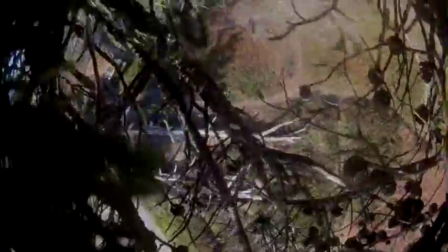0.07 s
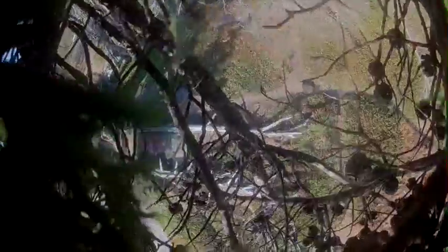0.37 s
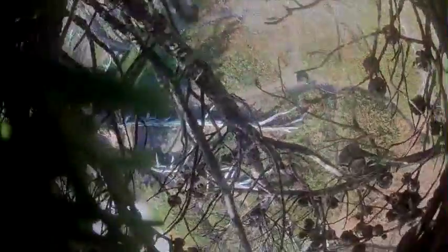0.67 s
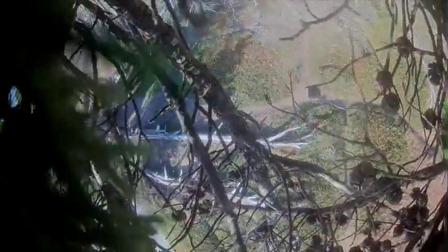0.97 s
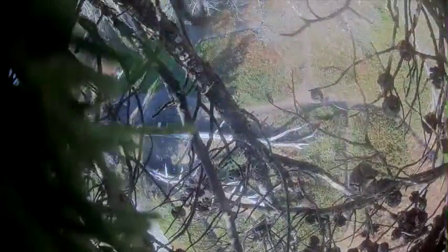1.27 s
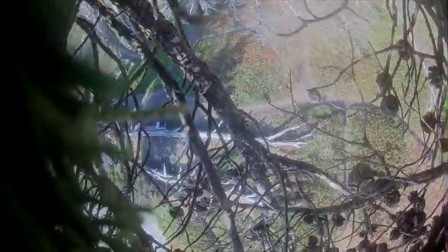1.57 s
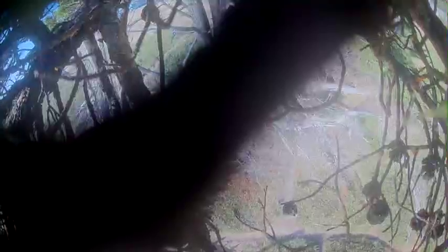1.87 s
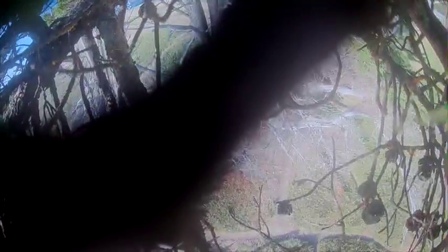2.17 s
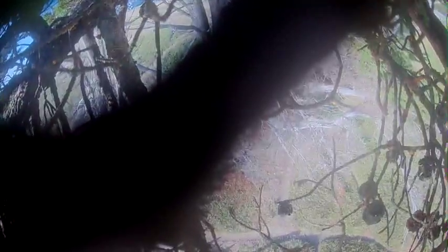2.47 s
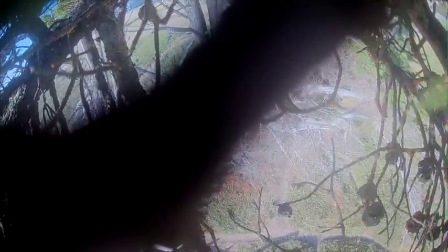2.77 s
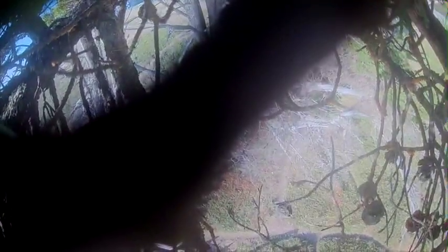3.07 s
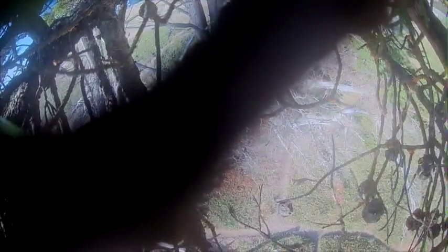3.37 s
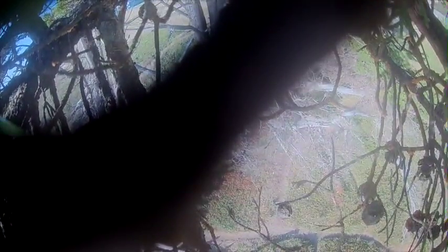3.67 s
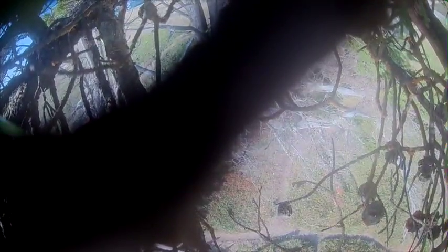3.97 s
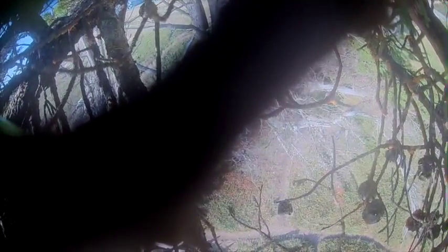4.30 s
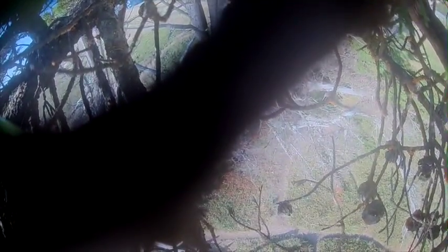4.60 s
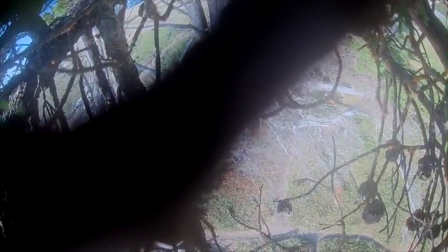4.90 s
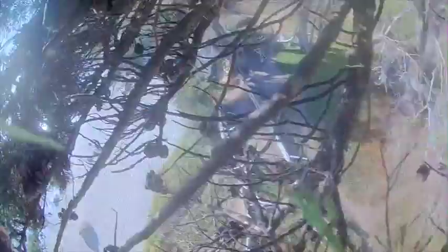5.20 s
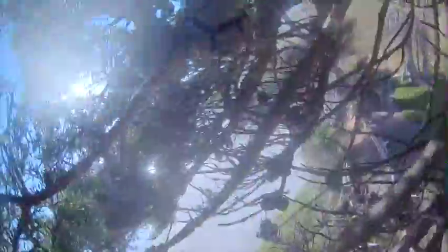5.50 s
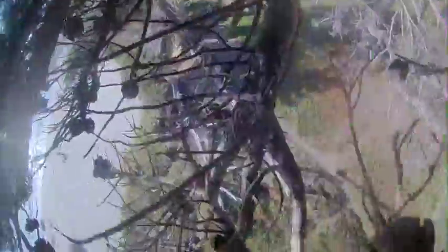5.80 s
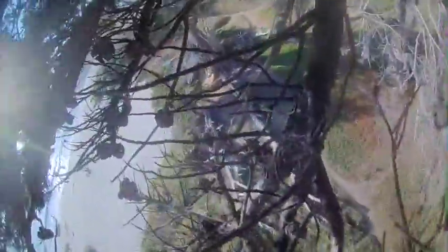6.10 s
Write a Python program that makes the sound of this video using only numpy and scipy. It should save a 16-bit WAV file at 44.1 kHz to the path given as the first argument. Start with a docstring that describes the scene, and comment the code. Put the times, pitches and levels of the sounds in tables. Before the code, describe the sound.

A small drone is stuck in a pine tree, heard very close through its own microphone. Its blades beat and grind on the branches in rapid, crunchy bursts, with thin ticking from a stalled motor and a brief wavering whine. The motors stop, leaving soft wind hissing in the needles. Then a hard knock starts a short, racing whine that falls away, and twigs tap the body. The hardest blows distort.

```python
"""Chopping and grinding: a small drone is stuck in a pine, heard by its own tiny microphone.
Its motors try to start. The blades beat and rub on branches and make the frame ring, stalled motors
twitch, and free ones whine, at last racing to tear the drone loose. Twigs tap the body, wind hisses
in the needles, and the hard blows overload the microphone."""
import sys
import numpy as np
from scipy import signal
from scipy.fft import rfft, irfft, next_fast_len
from scipy.io import wavfile
from scipy.ndimage import map_coordinates

SR = 44100
rng = np.random.default_rng(int(sys.argv[2]) if len(sys.argv) > 2 else 0)


def log_audio(samples):
    """Write samples as a 16-bit WAV file to the path given in sys.argv[1]."""
    # one column per channel
    frames = np.atleast_2d(samples).T
    # limit to full scale, then quantise
    limited = np.clip(frames, -1, 1)
    pcm = np.round(limited * 32767).astype(np.int16)
    wavfile.write(sys.argv[1], SR, pcm)


N = 275625

# the tone of crunching bark: pitch_hz, level_db
BARK_TONE = [(100, -48), (400, -27.5), (800, -4.5), (1300, -2.5), (2000, -0.5), (2350, -4), (2600, -4.5),
             (3100, -8.5), (3650, -3), (4600, -15.5), (6200, -17.5), (8000, -21.5), (11000, -20.5),
             (16000, -38)]


def amp(db):
    """Turn decibels into a number to multiply a sound by."""
    return 10 ** (np.asarray(db) / 20)


def unit(x):
    """Scale a sound to an average (rms) level of 1."""
    return x / np.sqrt(np.mean(x ** 2) + 1e-20)


def gain(points, hz):
    """Read the gain at a pitch from rows of pitch_hz, level_db."""
    pitch_hz, level_db = np.transpose(points)
    return amp(np.interp(np.log(hz + 1), np.log(pitch_hz + 1), level_db))


def curves(rows):
    """Join timed rows with straight lines: one curve for each column after the time."""
    time_s, *columns = np.transpose(rows)
    return [np.interp(np.arange(N) / SR, time_s, column) for column in columns]


def wobble(rate):
    """A smooth curve through `rate` random values a second."""
    return map_coordinates(rng.standard_normal(int(N * rate / SR) + 4), [np.arange(N) * rate / SR])


def filtered(x, response):
    """Turn each pitch in a sound up or down by response(hz)."""
    size = next_fast_len(N + SR // 2)
    return irfft(rfft(x, size) * response(np.fft.rfftfreq(size, 1 / SR)), size)[:N]


def coloured(x, points):
    """Shape a sound's tone by rows of pitch_hz, level_db, then scale it to level 1."""
    return unit(filtered(x, lambda hz: gain(points, hz)))


def add(track, start_s, sound):
    """Mix a sound into the track at start_s."""
    start = max(round(start_s * SR), 0)
    track[start:start + len(sound)] += sound[:N - start]


def contacts(rows, rise_s=0.016, fall_s=0.11):
    """Loudness of contacts that catch, swell, ease and let go; rise_s and fall_s each span 60 dB."""
    t, loudness = np.arange(N) / SR, np.zeros(N)
    for start, peak, end, peak_db, swell_db in rows:
        outside = np.maximum(start - t, 0) / rise_s + np.maximum(t - end, 0) / fall_s
        below_peak_db = swell_db * np.interp(t, [start, peak, end], [1, 0, 1])
        loudness += amp(peak_db - below_peak_db - 60 * outside)
    return loudness


def wind(flutter_db=1.0, sizzle_db=-44, sizzle_growth=3.25, usual_db=-31):
    """Air hisses through the needles; a thin sizzle on top swells and sinks more than the hiss."""
    # the wind's strength: time_s, level_db
    strength = [(0, -28.5), (.83, -33), (2.65, -30.5), (3.55, -30.5), (3.85, -30), (4.2, -31.5),
                (4.95, -31), (5.55, -33), (6.25, -33.5)]
    # the tone of the hiss: pitch_hz, level_db
    hiss_tone = [(30, -26), (100, -30), (200, -25), (300, -21), (500, -16.5), (800, -8), (1200, -3.5),
                 (1900, 1), (3100, -2), (3900, -7), (4800, -17.5), (6300, -41), (8000, -36), (15500, -56)]
    # the tone of the sizzle: pitch_hz, level_db
    sizzle_tone = [(3000, -66), (4600, -15), (5700, 0.5), (6400, -5), (7200, -12), (8100, -35),
                   (10800, -20), (12000, -30), (15500, -36)]
    hiss_db, = curves(strength)
    hiss = amp(hiss_db) * coloured(rng.standard_normal(N), hiss_tone)
    sizzle = coloured(rng.standard_normal(N), sizzle_tone)
    sizzle *= amp(sizzle_db + sizzle_growth * (hiss_db - usual_db))
    return amp(flutter_db * wobble(9.2)) * (hiss + sizzle)


def settling_twigs(middle_hz=1994, spread_octaves=0.356, scatter_db=1):
    """Twigs settle and spring back in short spells. Gives faint taps: start_s, level_db, pitch_hz."""
    # spells of settling: start_s, end_s, taps_per_s, level_db
    spells = [(1.721, 1.88, 20, -24), (5.435, 5.72, 14, -24), (5.76, 5.88, 45, -21),
              (5.954, 6.08, 29.4, -25)]
    rows = []
    for start, end, rate, level_db in spells:
        for time_s in np.arange(start, end, 1 / rate):
            size, pitch = rng.standard_normal(2)
            late_s = rng.random() / rate / 2
            pitch_hz = middle_hz * 2 ** (spread_octaves * pitch)
            rows.append((time_s + late_s, level_db + scatter_db * size, pitch_hz))
    return rows


def twig_taps(snap_db=2, wood_db=6, snap_fade_s=0.016, wood_fade_s=0.017, stretch=0.032, rise_s=0.0012):
    """Each twig gives a dry snap and a short woody note; heavier ones stay in contact longer."""
    # the clearest twigs and cones tapping the body: start_s, level_db, pitch_hz
    clear_taps = [(0.065, -16, 820), (0.085, -13, 1060), (0.108, -11, 2540), (.127, -15, 2630),
                  (.801, -21, 2620), (.823, -12.5, 1062), (.855, -21, 2180), (.882, -14.5, 2180),
                  (1.286, -14, 1630), (1.335, -5.5, 2530), (1.501, -9, 1680), (1.534, -8, 3630),
                  (1.594, -5, 1624), (1.704, -15, 1790), (2.656, -14.5, 1720), (4.977, -15.5, 2560),
                  (5.011, -11.5, 1636), (5.286, -13.5, 1650), (5.321, -10, 1350), (5.342, -12.5, 1360),
                  (5.355, -17.5, 1940), (5.414, -16.5, 1410), (5.437, -19, 4020), (5.744, -11, 3910),
                  (5.774, -17, 1710), (5.79, -2, 3810), (5.842, -19.5, 1330), (5.888, -13.5, 1340),
                  (5.898, -6.5, 1466)]
    t = np.arange(SR // 10) / SR
    onset = 1 - np.exp(-t / rise_s)
    snaps, notes = np.zeros(N), np.zeros(N)
    for start_s, level_db, pitch_hz in clear_taps + settling_twigs():
        fall_db = -60 * t / np.exp(stretch * (level_db + 16.5))  # louder taps fade more slowly
        add(snaps, start_s, amp(level_db + fall_db / snap_fade_s) * onset)
        drift = np.cumsum(rng.normal(0, 0.059, len(t)))  # roughens the note
        note = np.sin(2 * np.pi * pitch_hz * t + drift)
        add(notes, start_s, amp(level_db + fall_db / wood_fade_s) * onset * note)
    snap_tone = [(100, -51), (900, 4.5), (2000, 4.5), (6000, -6), (8000, -20), (11000, -11), (16000, -38)
                 ]
    crack = coloured(rng.standard_normal(N), snap_tone)
    return amp(snap_db) * snaps * crack + amp(wood_db) * notes


def stalled_motor(ticks_per_s=85, uneven_db=3.5, scatter_db=3, fade_s=0.017):
    """A blocked motor jerks from one magnet to the next: thin, uneven ticks."""
    # spells of twitching against a branch: start_s, peak_s, end_s, peak_db, swell_db
    twitches = [(0, .7, 0.804, -21.5, 9.5), (.88, 1.25, 2.3, -28, 2), (1.8, 1.93, 2, -31, 24),
                (2.685, 2.7, 2.8, -23.5, 16)]
    steps = np.floor(np.cumsum(ticks_per_s * amp(uneven_db * wobble(60))) / SR)
    kicks = np.diff(steps, prepend=0) * amp(scatter_db * rng.standard_normal(N))
    tick_shape = amp(-60 * np.arange(SR // 20) / SR / fade_s)
    ticks = signal.fftconvolve(kicks, tick_shape)[:N]
    metal_tone = [(300, -42), (1500, -1), (4000, -4.5), (5500, -2), (6400, -0.5), (7800, -17),
                  (11000, -9.5), (16000, -25)]
    metal = coloured(rng.standard_normal(N), metal_tone)
    return contacts(twitches) * unit(ticks * metal)


def branch_rasp(wood_hz=1315, width_hz=140, lumps_db=3):
    """Uneven rubbing brings out the one woody note of a thin branch."""
    # the blades rubbing this branch: start_s, peak_s, end_s, peak_db, swell_db
    rasps = [(.27, .4, 0.52, -16, 8.7), (.94, 1.15, 1.22, -12.5, 9.3)]
    rubbing = rng.standard_normal(N) * amp(lumps_db * wobble(100))
    wood = filtered(rubbing, lambda hz: hz * width_hz / (wood_hz ** 2 - hz ** 2 + 1j * hz * width_hz))
    return contacts(rasps) * unit(wood)


def frame_ring(t, tilt_db_per_octave, scatter_db=1.5):
    """The struck frame rings with several notes at once; more tilt favours the high ones."""
    # the frame's own notes: pitch_hz, level_db, fade_s (time to fall 60 dB)
    notes = [(859, -3.5, 0.021), (1088, -15.5, 0.038), (1606.6, -1, 0.052), (2580, -3, 0.035),
             (3643, -9, 0.026), (4166, -16.5, 0.033), (5400, -21, 0.043), (6410, -21, 0.016)]
    main_hz = max(notes, key=lambda note: note[1])[0]
    ring = np.zeros(len(t))
    for pitch_hz, level_db, fade_s in notes:
        size, phase = rng.standard_normal(2)
        start_db = level_db + tilt_db_per_octave * np.log2(pitch_hz / main_hz) + scatter_db * size
        ring += amp(start_db - 60 * t / fade_s) * np.sin(2 * np.pi * pitch_hz * t + phase)
    return ring


def grinding(slips_per_s=700, scatter_db=5, lumps_db=1.5, frame_gain=0.63, rub_gain=0.82):
    """Bark catches and slips on the blades; the slips shake the frame too."""
    # the blades pressing on bark: start_s, peak_s, end_s, peak_db, swell_db
    rubs = [(0, .005, 0.041, -14, 17), (.11, .43, 0.776, -12, 16), (.89, 1.19, 1.294, -14, 10),
            (1.26, 1.32, 2.14, -30.5, 11), (1.92, 2.27, 2.43, -18.5, 8.5), (2.69, 3.18, 3.21, -34.5, -1.5),
            (5.025, 5.06, 5.1, -14.5, 3), (5.17, 5.19, 5.24, -6.5, 8.5), (5.265, 5.32, 5.46, -32, 9),
            (5.745, 5.805, 5.94, -26.5, 13.5)]
    slips = (rng.random(N) < slips_per_s / SR) * rng.standard_normal(N)
    slips *= amp(scatter_db * rng.standard_normal(N))
    scrape = coloured(unit(slips) + rub_gain * rng.standard_normal(N), BARK_TONE)
    ring = frame_ring(np.arange(SR // 10) / SR, tilt_db_per_octave=16)
    frame = unit(signal.fftconvolve(scrape, ring)[:N])
    return contacts(rubs) * unit((scrape + frame_gain * frame) * amp(lumps_db * wobble(130)))


def free_motors(cruise_hz=300, flutter=0.0021, rough_db=2, fade_in_share=0.14, fade_out_s=0.012):
    """Blade hum and magnet whine glide with the speed; a bent tip brushes the needles once a turn."""
    # one list for each free run: time_s, blade_rate_hz, whine_db
    runs = [
        [(1.86, 149.5, -20), (1.93, 419, -18.5), (2.05, 424.6, -36), (2.14, 331.5, -25), (2.25, 376, -25),
         (2.34, 341, -18), (2.415, 195.4, -18), (2.445, 176.5, -29), (2.48, 172.9, -27), (2.545, 188, -19.5),
         (2.62, 62, -40)],
        [(5.035, 130, -12), (5.06, 399, -6), (5.072, 741.7, -27), (5.092, 1064, -24), (5.116, 1189, -24),
         (5.142, 1073, -19), (5.18, 746.5, -28), (5.222, 380, -8), (5.245, 216.3, -21), (5.275, 78.4, -33)],
    ]
    # the tones of the blades: times_blade_rate, level_db
    blade_tones = [(1, 4.5), (2, 3.5), (3, -3), (4, -9.5)]
    # the tones of the magnets: times_blade_rate, level_db
    magnet_tones = [(14, -6), (18, -0.5), (36, -4)]
    # how the microphone's opening shapes the hum: pitch_hz, level_db
    mic_opening = [(60, -17), (350, -19), (800, -6), (1200, -5.5), (6500, 3.5), (7500, 5), (9000, -9),
                   (14000, -70)]
    # how strongly the motor's shell gives off the whine: pitch_hz, level_db
    motor_shell = [(1500, 5), (2400, 1), (3050, -10), (3650, 6), (4700, -8), (6300, 6.5), (7100, -7.5),
                   (8200, -28)]
    # the tone of air and bark thrown off the blades: pitch_hz, level_db
    swish_tone = [(100, -42), (500, -28), (950, 1.5), (1600, 2), (3600, -5), (4150, 8), (4700, -15.5),
                  (6500, 3), (8000, -28), (11000, -5.5), (16000, -29)]
    t, out = np.arange(N) / SR, np.zeros(N)
    air = coloured(rng.standard_normal(N), swish_tone)
    for run in runs:
        start, end = run[0][0], run[-1][0]
        on = (t > start) & (t < end)
        rate_hz, whine_db = (curve[on] for curve in curves(run))
        octaves = np.log2(rate_hz / cruise_hz)
        hum_db = -29.5 + 13 * octaves  # faster blades are louder
        swish_db = -19 + 7 * np.minimum(octaves, 1.17)  # levels off at high speed
        fade_in = (t[on] - start) / (end - start) / fade_in_share
        fade = np.minimum(np.minimum(fade_in, (end - t[on]) / fade_out_s), 1)
        phase = 2 * np.pi * np.cumsum(rate_hz * (1 + flutter * wobble(250)[on])) / SR
        for tones, db, shape in (blade_tones, hum_db, mic_opening), (magnet_tones, whine_db, motor_shell):
            loudness = fade * amp(db + rough_db * wobble(300)[on])
            for multiple, level_db in tones:
                hz = multiple * rate_hz
                strength = amp(level_db) * gain(shape, hz) * (hz < SR / 2)
                out[on] += loudness * strength * np.sin(multiple * phase + np.pi / 4)
        turn = (phase / (2 * np.pi) / 2) % 1  # two blade passes to a turn
        bent_tip = 1.1 * np.exp(-turn / 0.19)
        pulsing = 1 + 0.24 * np.cos(phase) + bent_tip
        out[on] += fade * amp(swish_db) * air[on] * unit(pulsing)
    return out


def blow_list(knock_tilt_db_per_octave=7.5, scatter_db=1.5):
    """Lone knocks, then bouts of beating. Gives start_s, crunch_db, ring_db, tilt_db_per_octave."""
    # a blade or arm knocking once on a branch: start_s, crunch_db, ring_db
    knocks = [(.001, -8, -18), (0.141, -12, -8.5), (.177, 6, 0), (.19, 7, -9), (.221, -7, -8),
              (.239, -4, -6), (.253, 1, -5), (.901, 14.5, 5), (1.239, 1.5, -11), (1.271, -15, -14),
              (1.37, -11, -11), (1.436, -4, -21), (5.025, 13.5, 8.5), (5.053, -4, -9), (5.206, 6, 2),
              (5.252, -3, -13)]
    # a blade beating on a branch: first_s, last_s, blows_per_s, quickening (below 0 it slows),
    # crunch_db, ring_db, tilt_db_per_octave
    bouts = [(.297, 0.55, 51.6, -0.0038, 4, -1.5, 6.5), (0.577, 0.757, 27.9, -0.26, 7.5, 5, 2.9),
             (.94, 1.208, 45, .09, 1.5, -6, 5.9), (1.301, 1.671, 18.8, -0.021, 3.5, -3.5, 6.3),
             (1.976, 2.327, 40.2, .125, 2.5, 6.5, 3.8), (2.729, 2.851, 24.4, -0.046, -1, 4.5, 1.4),
             (2.886, 3.188, 33.2, 0.043, 2, 7, 1.4)]
    rows = [(*knock, knock_tilt_db_per_octave) for knock in knocks]
    for first, last, rate, quickening, crunch_db, ring_db, tilt in bouts:
        progress = np.linspace(0, 1, round((last - first) * rate) + 1)
        for start_s in first + (last - first) * (progress + quickening * progress * (1 - progress)):
            extra_crunch_db, extra_ring_db = scatter_db * rng.standard_normal(2)
            rows.append((start_s, crunch_db + extra_crunch_db, ring_db + extra_ring_db, tilt))
    return rows


def blade_pressure(blows, boost_db=9.5, press_s=0.0055):
    """Each blow presses the blade harder into the bark, so the rubbing is briefly louder."""
    t, press = np.arange(SR // 20) / SR, np.zeros(N)
    for start_s, *_ in blows:
        add(press, start_s, np.exp(-(t / press_s) ** 2 / 2))
    return amp(boost_db * np.minimum(press, 1))


def blade_strikes(blows, bark_db=-7, frame_db=-4, rise_s=0.0012, bite_s=0.0031, fade_s=0.046, spiky_db=3):
    """A blade bites into bark for a few milliseconds and sets the frame ringing."""
    t = np.arange(SR // 6) / SR
    onset = 1 - np.exp(-t / rise_s)
    fall_db = -60 * np.maximum(t - bite_s, 0) / fade_s
    bites, ring = np.zeros(N), np.zeros(N)
    for start_s, crunch_db, ring_db, tilt in blows:
        add(bites, start_s, onset * amp(crunch_db + fall_db))
        add(ring, start_s, amp(ring_db) * frame_ring(t, tilt))
    bark = coloured(rng.standard_normal(N) * amp(spiky_db * wobble(900)), BARK_TONE)
    return amp(bark_db) * bites * bark + amp(frame_db) * ring


def scene():
    """Everything reaches one microphone on the frame."""
    blows = blow_list()
    chopping = blade_strikes(blows)
    rubbing = blade_pressure(blows) * (grinding() + branch_rasp())
    mono = chopping + rubbing + twig_taps() + free_motors() + stalled_motor() + wind()
    return np.array([mono, mono])


def record(dry, ceiling=0.26, hardness=9, bias=0.0084, top_hz=15950):
    """The microphone's amplifier flattens loud peaks, a bit lopsidedly; the recorder dulls the highs."""
    # the recorder's tone: pitch_hz, level_db
    recorder_tone = [(30, -3.5), (5500, -1), (8000, -9.5), (9800, -16.5), (10800, -15.5), (12200, -22),
                     (14000, -14), (15600, -7)]
    drive = dry[0] + bias
    clipped = drive / (1 + np.abs(drive / ceiling) ** hardness) ** (1 / hardness) - bias
    out = filtered(clipped, lambda hz: gain(recorder_tone, hz) * (hz < top_hz))
    return np.array([out, out])


dry = scene()
out = record(dry)
log_audio(out)
```